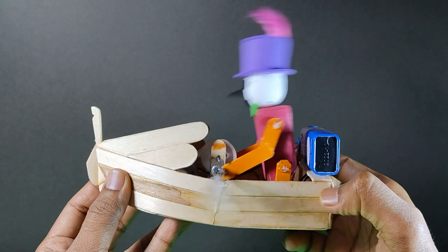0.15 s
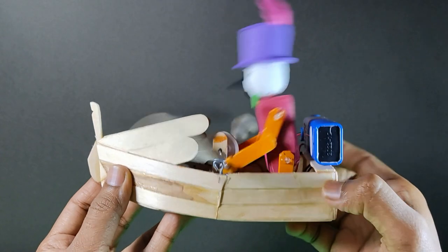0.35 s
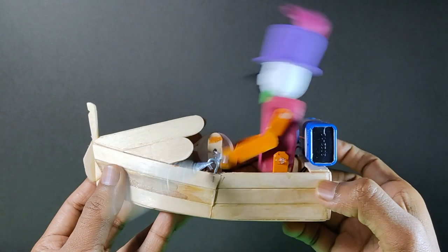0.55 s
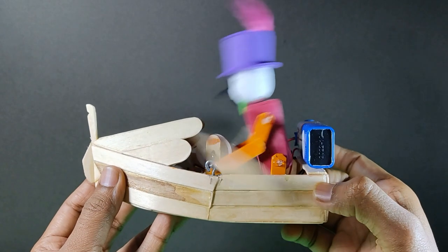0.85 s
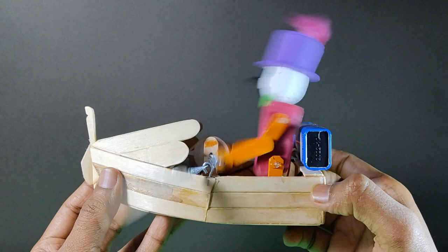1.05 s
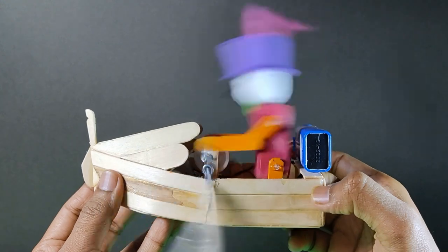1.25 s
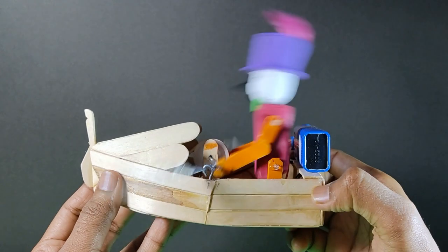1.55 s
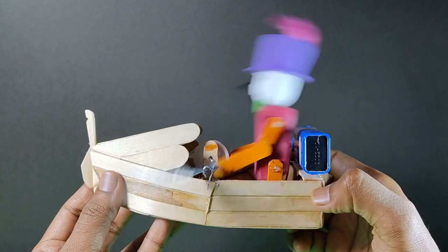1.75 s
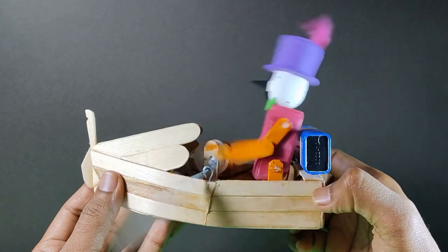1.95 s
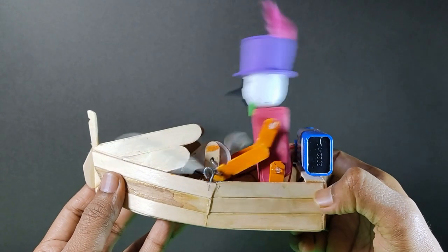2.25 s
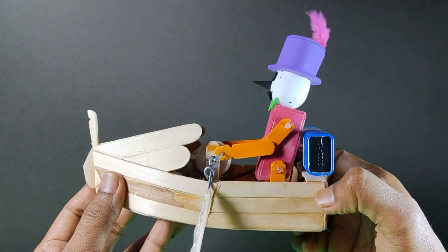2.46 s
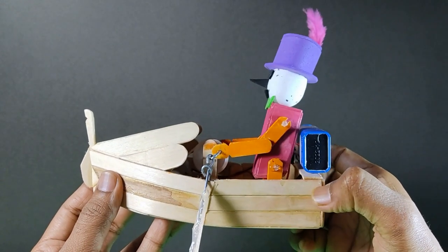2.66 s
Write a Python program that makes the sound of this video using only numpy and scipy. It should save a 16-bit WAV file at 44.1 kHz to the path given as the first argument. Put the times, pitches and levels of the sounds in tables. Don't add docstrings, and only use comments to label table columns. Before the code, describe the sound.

Rapid dry clicking and rattling of a little motor-driven wire linkage on thin wood, ending abruptly.

```python
import sys
import numpy as np
from scipy import signal
from scipy.io import wavfile
from scipy.ndimage import uniform_filter1d

SR = 44100
rng = np.random.default_rng(int(sys.argv[2]) if len(sys.argv) > 2 else 0)


def file_out(sig):
    cols = np.atleast_2d(sig).T
    lim = np.clip(cols, -1, 1)
    pcm = np.round(lim * 32767).astype(np.int16)
    wavfile.write(sys.argv[1], SR, pcm)


def nominal_scale(level):
    x = np.asarray(level, float) / 20
    return 10 ** x


N = 123479


def evened(x):
    return x / np.sqrt(np.mean(x ** 2) + 1e-20)


def read(points, hz):
    f, value = np.transpose(points)
    return np.interp(np.log(hz + 1), np.log(f + 1), value)


def colour(x, points, share=1):
    log_gain = share * read(points, abs(np.fft.fftfreq(4096, 1 / SR))) * np.log(10) / 20
    taps = np.fft.ifft(np.exp(np.conj(signal.hilbert(log_gain)))).real[:2048]
    return signal.oaconvolve(x, taps)[:N]


def resonate(x, hz, width):
    pole = np.exp((2j * np.pi * hz - np.pi * width) / SR)
    return 2 * signal.lfilter([1 - abs(pole)], [1, -pole], x).real


def fade(x, t60):
    return signal.lfilter([1], [1, -10 ** (-3 / (t60 * SR))], x)


def smear(x, seconds):
    hump = np.hanning(round(seconds * SR))
    return np.convolve(x, hump / hump.sum(), "same")


def clicks(per_s, spread_db):
    grain_s = 0.00046
    strength = nominal_scale(spread_db * np.minimum(rng.exponential(1, N), 2.5))
    impacts = strength * (rng.random(N) < per_s / SR)
    return evened(fade(impacts, grain_s * 7) * rng.standard_normal(N))


# frequency in Hz, level in dB per Hz.
AIR = [(20, 4), (50, -10), (125, -15), (180, -9.5), (260, -17), (4400, -29.5), (7900, -16), (16000, -68)]
# frequency in Hz, likeness from 0 to 1.
AIR_SAME = [(60, .55), (180, .7), (640, .3), (3000, .03)]
# frequency in Hz, left minus right in dB.
AIR_PAN = [(60, 2), (250, 6), (1300, 2), (8000, -6.5), (15000, -.5)]


def air():
    hz = np.fft.rfftfreq(1024, 1 / SR)
    a, b, c, d = rng.standard_normal((N // 256 + 5, 513, 4)).T
    same = np.clip(read(AIR_SAME, hz), -1, 1)[:, None]
    left, other = a + 1j * b, c + 1j * d
    z = np.array([left, same * left + np.sqrt(1 - same ** 2) * other])
    pan = read(AIR_PAN, hz) / 2
    z = z * nominal_scale(read(AIR, hz) + np.array([pan, -pan]))[:, :, None]
    noise = signal.istft(z, nperseg=1024, noverlap=768)[1][:, :N]
    return nominal_scale(-56) * evened(noise)


# start in seconds, wire tick in dB, hull knock in dB re the tick, rattle in dB re the tick.
SNAPS = [(0.1638, -30, -27, -45), (0.225, -17, -10, -49), (0.2373, -14, -37, -23),
         (0.2811, -11.5, -24.5, -49), (0.3246, -30, -10, -10.5), (0.3771, -23, -7.5, -1),
         (0.3908, -13.5, -18, -10), (0.423, -10, -12.5, -13.5), (0.4358, -3.5, -34, -37),
         (0.4605, -9.5, -8, -12), (0.5542, -14.5, -28, -21.5), (0.5818, -18.5, -39, -22),
         (0.5946, -17, -7.5, -7), (0.6048, -14.5, -8.5, -9), (0.6479, -5.5, -11, -15.5),
         (0.6806, -21, -19, -24), (0.7306, -28.5, -9, 2.5), (0.7626, -8, -10.5, -10.5),
         (0.7776, -10.5, -31, -10), (0.8124, -5.5, -13, -15.5), (0.8988, -24.5, -35, -7.5),
         (0.9315, -13.5, -19, -11), (0.9462, -6.5, -11, -12), (1.046, -37, -28, -11),
         (1.0815, -31, -8, 4),
         (1.0992, -21.5, -13, -7), (1.1145, -8, -15.5, -10.5), (1.121, -2, -25, -30),
           (1.2025, -11.5, -24, -36), (1.249, -33, -4, -26), (1.27, -17.5, -13.5, -14),
           (1.2855, -14, -11, -3.5), (1.3402, -13, -18, -15.5), (1.3672, -8, -39, -21.5),
           (1.436, -24.5, -31, -7.5), (1.4509, -11.5, -8, -8), (1.4923, -13, -10, -7.5),
           (1.5789, -13, -30, -25), (1.6, -13.5, -46, -12), (1.6172, -2, -24.5, -18.5),
           (1.6651, -8, -10, -13), (1.7231, -7, -26.5, -43), (1.766, -28.5, -29, -4),
           (1.7948, -13, -22, -8), (1.8023, -4.5, -17, -23), (1.8524, -7.5, -16.5, -12),
         (1.9555, -18.5, -34, -19), (1.9788, -17.5, -33, -8.5), (1.9972, -5.5, -11.5, -14),
                (2.0131, -8.5, -47, -23), (2.0366, -7, -14, -14), (2.0472, -7, -18, -29),
                (2.1602, -24, -15, -4.5), (2.175, -3.5, -15.5, -19), (2.2527, -5.5, -27.5, -29.5),
                (2.301, -32, -5, -2), (2.3374, -14, -3.5, -8), (2.3885, -1, -22.5, -20.5),
                (2.41, -19.5, -10.5, -17), (2.4754, -15, -13.5, -27), (2.493, -18, -33, -22),
                (2.5065, -8, -13.5, -13), (2.527, -12, -15.5, -37), (2.7032, -33, -17, -50),
                (2.7658, -40, -16, -14),
         (0.4759, -12, -30, -31), (0.8272, -18.5, -7, -19), (0.9611, -6.5, -27, -36),
         (0.9965, -23.5, -2.5, -2.5), (1.1578, -17.5, -4.5, -5.5), (1.1772, -11, -14, -17.5),
         (1.3255, -13.5, -6.5, -15.5), (1.3844, -29, -24, -22), (1.508, -22.5, -1, -27),
         (1.6079, -13, -7, -24), (1.629, -19, -28, -35), (1.647, -37, -13, -56), (1.6894, -55, -19, -51),
         (1.813, -6.5, -19, -37), (1.877, -17.5, -8.5, -30), (2.063, -29, -18, -28),
         (2.0901, -11, -22, -40), (2.1955, -33, 8, 9.5), (2.3251, -17, -8.5, -6.5), (2.346, -6, -42, -30),
         (2.3612, -16.5, -13, -8),
         (0.4107, -12, -25, -30), (0.445, -16, -19, -30), (0.4874, -30, -22, -30), (0.6125, -34, -22, -24),
         (0.6684, -12.5, -17, -27), (0.7488, -19, -18, -30), (0.7776, -9, -26, -26),
         (0.8457, -14, -22, -30), (0.937, -7, -28, -30), (0.9447, -13, -18, -30), (0.9502, -9, -21, -32),
         (0.978, -26, -17, -30), (1.0104, -31, -22, -30), (1.1267, -9, -20, -32), (1.1344, -30, -31, -28),
         (1.1614, -15, -27, -28), (1.185, -18, -29, -30), (1.1905, -23, -22, -32), (1.297, -21, -27, -30),
         (1.4494, -16, -22, -30), (1.5192, -19, -22, -35), (1.7826, -18, -20, -24),
         (1.8604, -6.5, -15.5, -30), (1.9014, -21, -28, -35), (1.9877, -11.5, -23, -33),
         (2.0197, -9, -33, -30), (2.163, -24, -17, -24), (2.429, -18, -22, -34), (2.5132, -11, -12.5, -28),
         (2.5444, -37, -27, -39)]


def linkage():
    s, tick_db, knock_db, rattle_db = np.transpose(SNAPS)
    knock_late_s, lead_s = 0.001568, 0.001
    at = np.round(s * SR).astype(int)
    tick, knock, loose, loose_wood = np.zeros((4, N))
    tick[at] = nominal_scale(tick_db)
    knock[at + round(knock_late_s * SR)] = nominal_scale(tick_db + knock_db)
    early = at - round(lead_s * SR)
    loose[early] = nominal_scale(tick_db + rattle_db) ** 2
    loose_wood[early] = loose[early] * nominal_scale(knock_db)
    return tick, knock, loose, loose_wood


def snap_and_knock(tick, knock):
    tick_t60, tick_rise_s = 0.0096, 0.0036
    knock_t60, knock_rise_s = 0.013, 0.00052
    burst = rng.choice([-1., 1.], N)
    snaps = nominal_scale(2.5) * smear(fade(tick, tick_t60), tick_rise_s) * burst
    rough = smear(fade(knock, knock_t60), knock_rise_s) * burst
    return snaps, nominal_scale(-9.5) * (4.4 * knock + 1.207 * rough)


def rattle(loose, loose_wood):
    t60, per_s, spread_db = 0.22, 1400, -1
    chatter = clicks(per_s, spread_db)
    power = uniform_filter1d(fade(loose, t60 / 2), size=300)
    on_wire = np.sqrt(abs(power)) * chatter
    on_wood = nominal_scale(-3.5 - 19.0) * np.sqrt(fade(loose_wood, t60 / 2)) * chatter
    return on_wire, on_wood


# frequency in Hz, width in Hz, level in dB.
HULL = [(437.5, 13.8, -11), (556, 4.9, -4.5), (662, 10.3, -2), (787.4, 8.9, 1.5), (904, 57, -9.5),
        (1091, 41, 2), (1218, 83.5, 4.5), (1441, 132, 9), (1573, 128, 2), (1788, 18, 0.5), (2128, 56, -1.5),
        (2440, 98, -2.5), (3060, 140, -9.5), (3370, 150, -8.5), (3630, 45, -28)]


def hull(force):
    modes = 0
    for k, (hz, width, db) in enumerate(HULL):
        modes = modes + (-1) ** k * nominal_scale(db) * resonate(force, hz, width)
    thud = nominal_scale(-16.5) * resonate(force, 233, 101)
    return nominal_scale(19.0) * (modes + thud)


def motor_running():
    on_s, off_s, fade_s = 0.312, 2.5, 0.049
    t = np.arange(N) / SR
    return np.clip(np.minimum(t - on_s, off_s + fade_s - t) / fade_s, 0, 1)


def gears(running):
    return nominal_scale(-43.5) * running * clicks(2800, 5.0)


def motor(running):
    hum_hz, hum_db, sag = 174, -72, .07
    stroke_hz, stroke_s = 5.8, .675
    crank = 2 * np.pi * stroke_hz * (np.arange(N) / SR - stroke_s)
    load = np.cos(crank)
    drift = uniform_filter1d(rng.standard_normal(N), 2000)
    wobble = evened(uniform_filter1d(drift, 2000))
    turns = np.cumsum(hum_hz * (1 - sag * np.sin(crank) + 0.0374 * wobble)) / SR
    level = nominal_scale(hum_db + 7 * load + 3 * wobble) * running
    return level * np.sqrt(2) * np.sin(2 * np.pi * turns)


# peak in Hz, width in Hz, level in dB.
PORTS = [(8480, 2740, 1), (8013, 1690, 10)]


def ports(x):
    return np.array([x + nominal_scale(peak_db) * resonate(resonate(x, hz, width), hz, width)
                     for hz, width, peak_db in PORTS])


def scatter(x, near_db, count=12):
    spot_s, t60 = .006, .011
    hold = round(spot_s * SR)
    spot = np.repeat(rng.integers(0, count, 1000), hold)[np.arange(N) % (1000 * hold)]
    near = rng.standard_normal((count, 2, 512)) * nominal_scale(-60 * np.arange(512) / SR / t60)
    near = nominal_scale(near_db) * near / np.linalg.norm(near, axis=2, keepdims=True)
    parts = [signal.oaconvolve(x * uniform_filter1d(1. * (spot == k), 40), near[k], axes=1)
             for k in range(count)]
    return x + sum(parts)[:, :N]


# frequency in Hz, time to fall 60 dB in seconds.
ROOM = [(200, 0.66), (1400, 0.31), (3000, 0.22), (5000, 0.19), (9000, 0.14)]


def room(x, count=4):
    taps = np.zeros((count, 2, SR // 2))
    jitter = rng.integers(0, 20, (count, 2, (SR // 2 - 201) // 20))
    at = np.arange(200, SR // 2 - 20, 20) + jitter
    np.put_along_axis(taps, at, rng.choice([-1., 1.], at.shape), 2)
    hz, t, z = signal.stft(taps, SR, nperseg=256)
    tail = signal.istft(z * nominal_scale(-60 * t / read(ROOM, hz)[:, None]), SR, nperseg=256)[1]
    tail = tail / np.linalg.norm(tail[0, 0])
    pose = np.arange(N) // 1500 % count
    turn = uniform_filter1d(1. * (pose == np.arange(count)[:, None]), 400)
    fed = x * np.sqrt(abs(turn))[:, None]
    return x + nominal_scale(-8.5) * signal.fftconvolve(fed, tail, axes=2).sum(0)[:, :N]


# frequency in Hz, level in dB.
WIRE = [(200, -33), (1500, -8), (2700, -11.5), (3500, -7.5), (4500, -16.5), (5600, -10), (9300, -10),
        (10800, -22.5), (15000, -32.5)]
# frequency in Hz, left minus right in dB.
SHADE = [(150, 7.5), (1300, 2.5), (3300, 2.5), (6500, -11), (12000, 1)]


def scene():
    left_lag = 6
    tick, knock, loose, loose_wood = linkage()
    snaps, knocks = snap_and_knock(tick, knock)
    wire_rattle, wood_rattle = rattle(loose, loose_wood)
    running = motor_running()
    grind = gears(running)
    snapping = scatter(ports(colour(snaps, WIRE)), near_db=-1)
    rattling = scatter(ports(colour(wire_rattle + grind, WIRE)), near_db=9)
    boat = hull(knocks + wood_rattle + nominal_scale(-17) * grind) + motor(running)
    left, right = snapping + rattling + boat
    left = np.roll(colour(left, SHADE, share=1 / 2), left_lag)
    toy = np.array([left, colour(right, SHADE, share=-1 / 2)])
    direct_boat = nominal_scale(-5.5) * np.array([np.roll(boat, left_lag), boat])
    return room(toy) + direct_boat + air()


def roll_off(x):
    return signal.sosfilt(signal.butter(12, 16120, fs=SR, output="sos"), x)


def record(dry):
    edge = signal.firwin(511, 15900, window=("kaiser", 9), fs=SR)
    limited = .9 * np.tanh(dry / .9)
    mix = signal.oaconvolve(limited, edge[None], "same")
    return roll_off(mix)


dry = scene()
out = record(dry)
file_out(out)
```